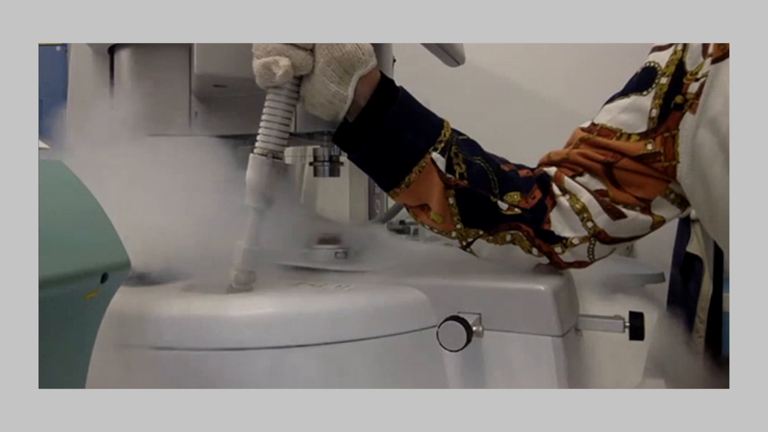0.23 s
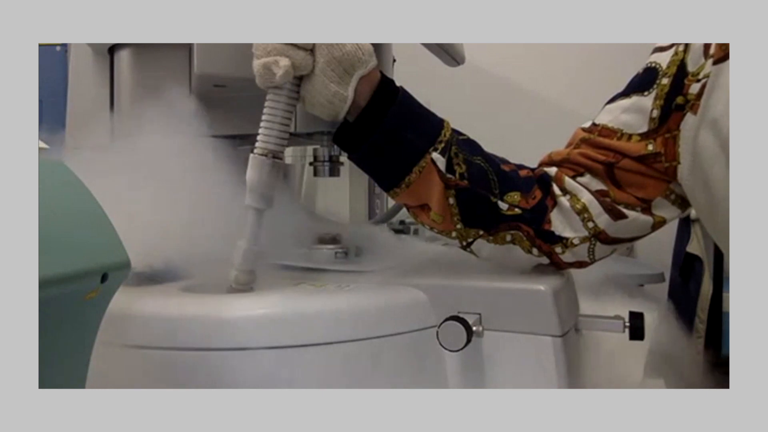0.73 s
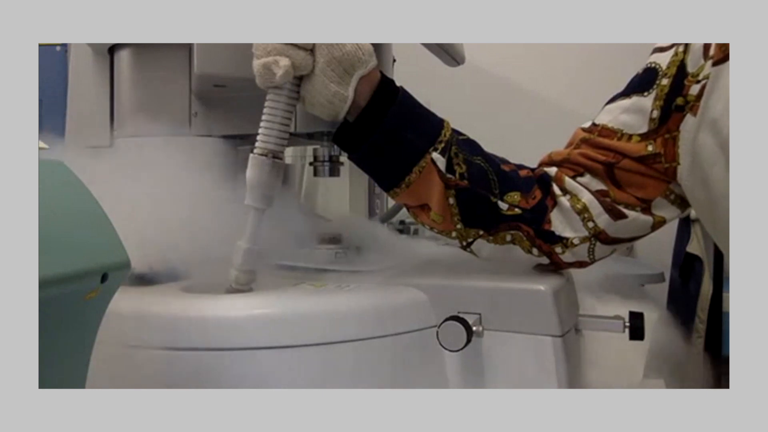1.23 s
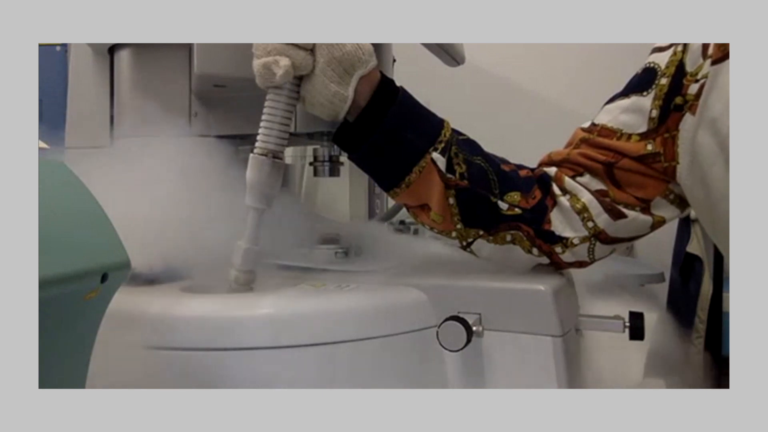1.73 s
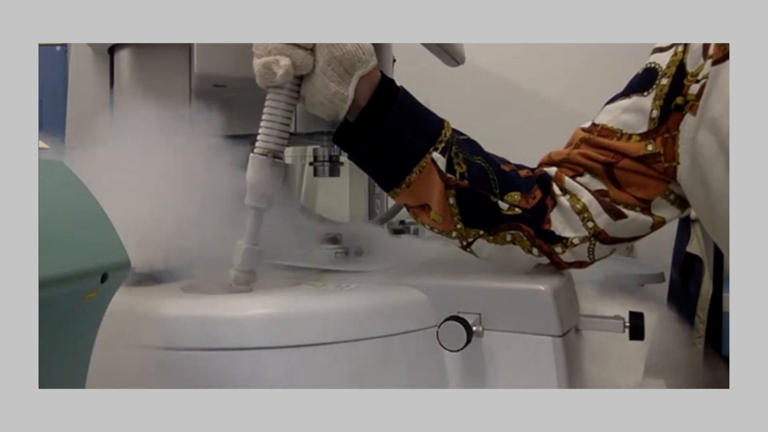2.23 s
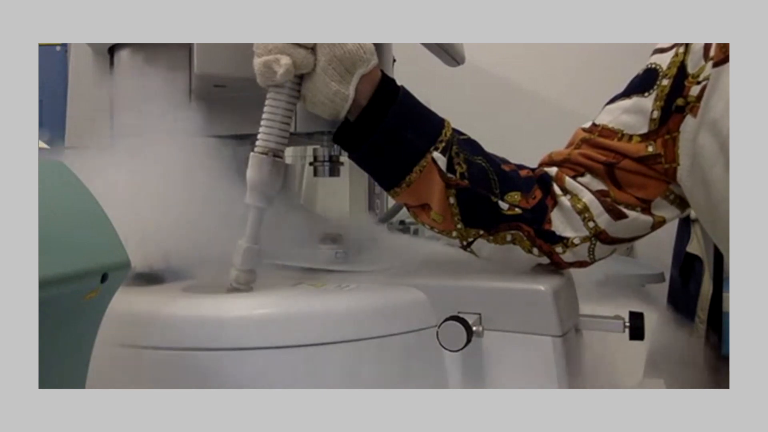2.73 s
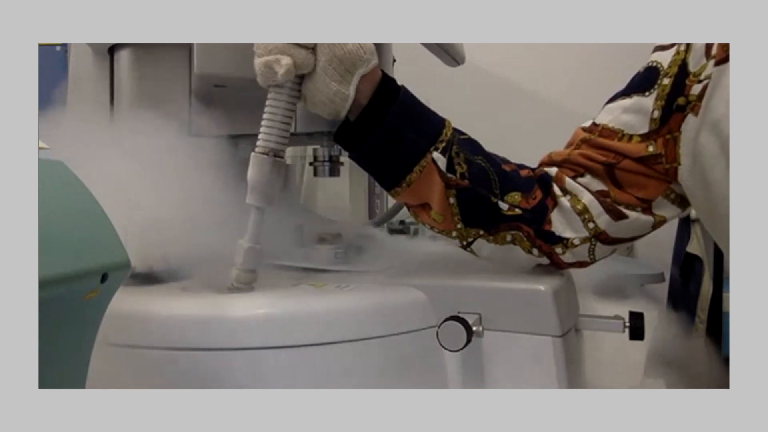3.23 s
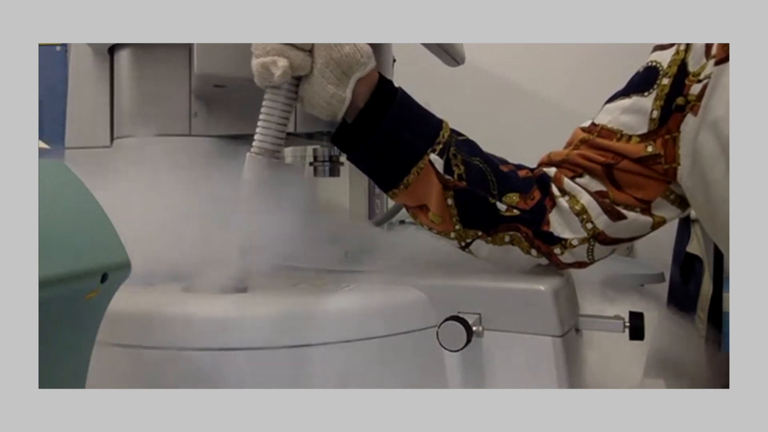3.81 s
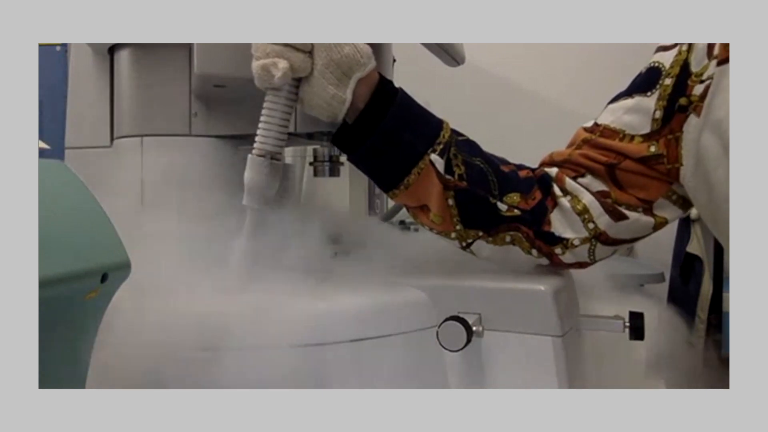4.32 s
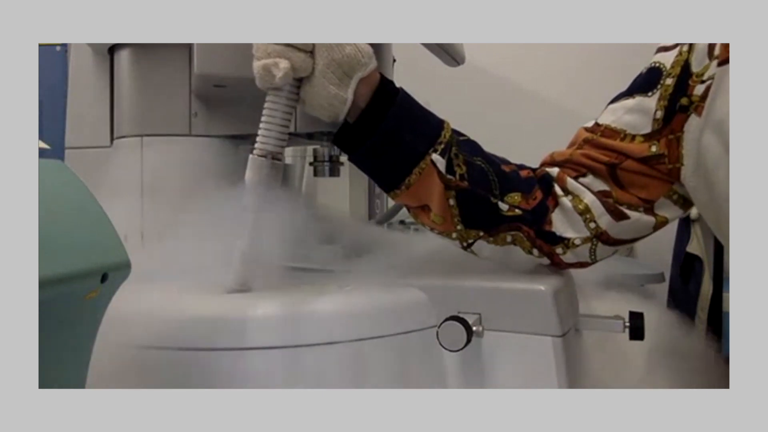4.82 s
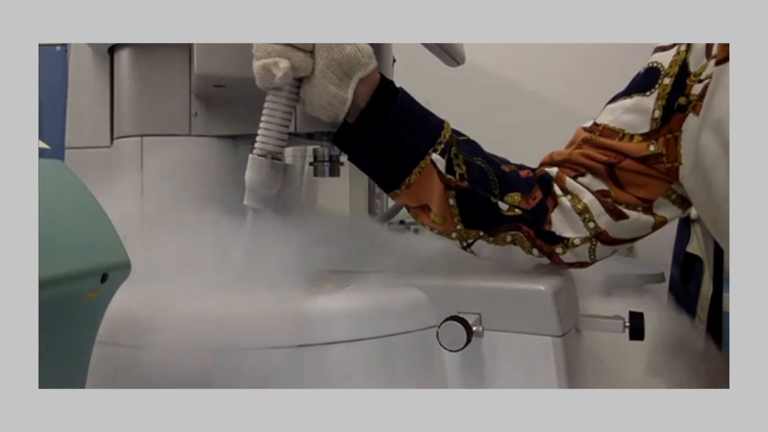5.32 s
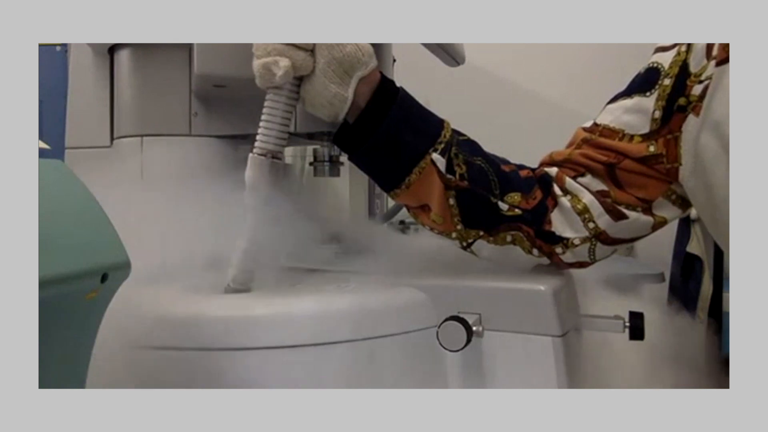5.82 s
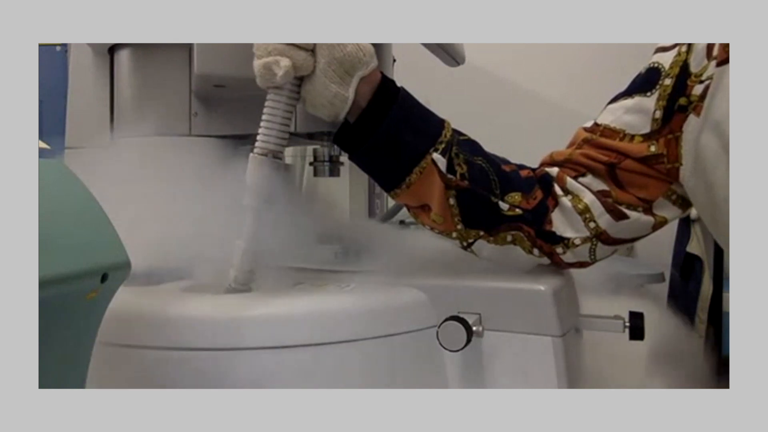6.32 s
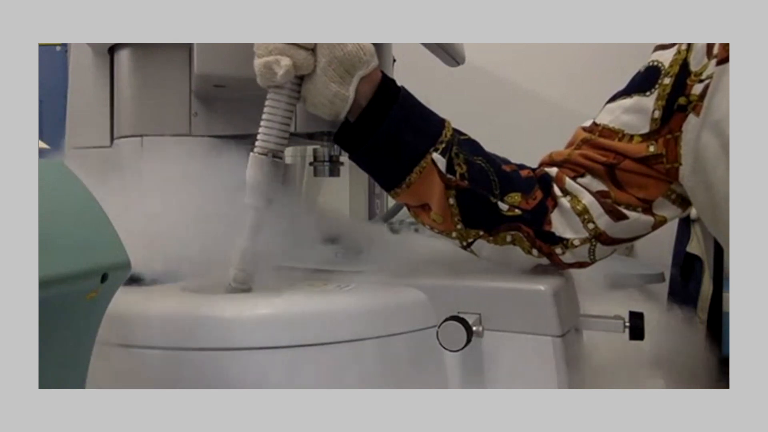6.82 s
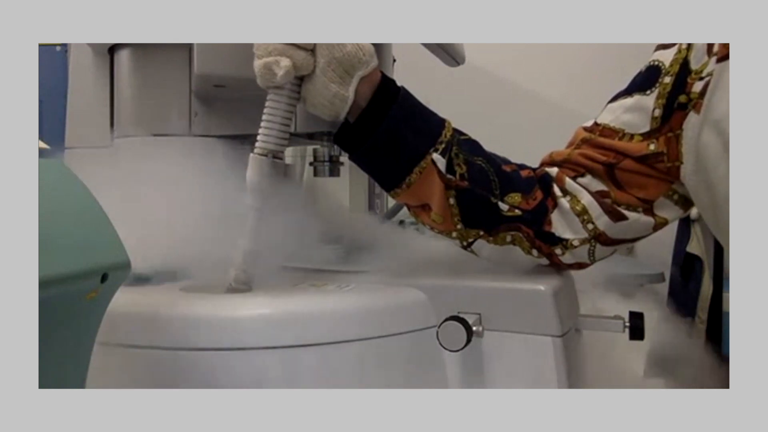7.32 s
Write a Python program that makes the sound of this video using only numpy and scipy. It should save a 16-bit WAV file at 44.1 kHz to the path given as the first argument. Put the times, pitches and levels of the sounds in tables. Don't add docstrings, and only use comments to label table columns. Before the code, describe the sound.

A bright, sputtering hiss of pressurized cold liquid spraying into a tank neck, with fluttering breathy whistles, tiny wet chirps and brief stalls.

```python
import sys
import numpy as np
from scipy import signal
from scipy.fft import rfft, irfft, next_fast_len
from scipy.io import wavfile
from scipy.ndimage import uniform_filter1d, map_coordinates

SR = 44100
rng = np.random.default_rng(int(sys.argv[2]) if len(sys.argv) > 2 else 0)


def digitize_waveform(pressure):
    field = np.atleast_2d(pressure).T
    bounded = np.clip(field, -1, 1)
    quanta = np.round(bounded * 32767).astype(np.int16)
    wavfile.write(sys.argv[1], SR, quanta)


def amplitude_ratio(level_db):
    exponent = np.asarray(level_db, float) / 20
    return 10 ** exponent


N = 332955
TIME = np.arange(N) / SR

# freq_hz, density_db (per Hz)
VENT_SPECTRUM = [(15, -65.5), (25, -40), (50, -16), (80, -9), (161, -3.5), (265, 0), (324, -5.5), (420, -6),
                 (550, -28.5), (920, -120)]
# time_s, jet_db, boiling_db
FLOW_LEVELS = [(0, -62.5, -76.5), (.25, -56.5, -71), (.55, -56, -69.5), (.8, -57, -71), (1.5, -59.5, -72),
               (2.0, -59.5, -72.5), (2.35, -57, -69.5), (3.0, -56.5, -70), (3.5, -58.5, -71.5),
               (3.92, -55.5, -69), (4.2, -59.5, -72.5), (4.55, -57.5, -68.5), (5.15, -61, -72),
               (5.45, -56, -70), (5.7, -56.5, -71), (6.2, -59.5, -73.5), (6.7, -58, -72),
               (7.55, -62.5, -75.5)]
# start_s, return_s, depth_db
GAS_POCKETS = [
    (1.275, 1.339, -10),
    (3.34, 3.379, -6.5),
    (3.835, 3.866, -4),
    (5.345, 5.4175, -12),
    (6.41, 6.441, -5),
]
# freq_hz, density_db (per Hz)
SPRAY_SPECTRUM = [(1290, -56), (2200, -26), (2700, -26), (2880, -13), (3050, -4), (3250, -1), (3600, -0.1),
                  (4170, -3), (4720, -5), (5970, -9), (6790, -9.5), (7470, -16.5), (8400, -70),
                  (10900, -120)]
# freq_hz, density_db (per Hz)
BOIL_SPECTRUM = [(210, -52), (350, -14), (661, -5), (865, -11.5), (986, -9.5), (1770, -12.5), (2520, -9),
                 (2800, -2.5), (3640, -30.5), (6160, -120)]
# pitch_hz, width_hz, boost_db
HOSE_MODES = [(670, 61, 1.5), (984, 38, 7.5), (1067, 26, 5.5), (1307, 62, 5), (1560, 210, 2.5)]
# time_s, pitch_hz, level_db
LOW_WHISTLE = [(0, 3750, -47.5), (.2, 3680, -45), (.36, 3800, -52), (.55, 3930, -48.5), (.72, 3740, -44.5),
               (1.0, 3680, -44), (1.25, 3820, -47), (1.65, 3670, -43), (2.05, 3690, -47.5),
               (2.7, 3625, -42.5), (3.55, 3650, -43.5), (4.05, 3500, -57.5), (4.33, 3560, -48.5),
               (4.5, 3680, -37.5), (4.75, 3540, -45.5), (5.5, 3590, -43.5), (6.2, 3530, -50),
               (7.55, 3650, -50)]
# time_s, length_s, level_db, pitch_hz
LOW_WHISTLE_SWELLS = [(3.319, .1, -44, 3650), (5.129, .08, -46.5, 3675), (.78, 0.099, -46, 3718),
                      (1.0, .1, -46, 3670), (4.57, .07, -43, 3651), (6.66, .2, -46, 3750),
                      (6.949, .15, -48, 3620)]
# time_s, length_s, level_db, pitch_hz
MID_WHISTLE_SWELLS = [(.25, .15, -46, 4640), (.47, .12, -47, 4200), (.86, .2, -47, 4710),
                      (1.15, .2, -51, 4673), (2.14, .12, -47, 4456), (2.39, .12, -44, 4516),
                      (2.64, .12, -45, 4610), (2.9, .4, -46.5, 4800), (3.7, .3, -52, 4870),
                      (4.0, .18, -45, 4994), (4.4, .14, -43, 4980), (4.6, .2, -44, 4640),
                      (5.32, .08, -48, 4630), (5.47, .1, -47, 4600), (5.91, .14, -49, 4445),
                      (6.29, .12, -51.5, 4510), (6.82, .18, -47.5, 4595)]
# time_s, length_s, level_db, pitch_hz
TOP_WHISTLE_SWELLS = [(.5, .1, -47.5, 7210), (.88, .15, -51, 7007), (1.1, 0.1498, -53, 6830),
                      (1.72, .2, -53, 6930), (2.139, .12, -54, 6800), (2.391, .1, -52, 6704),
                      (3.201, .3, -53.5, 6890), (3.62, .15, -48.5, 6910), (3.9, .13, -42, 6993),
                      (4.499, .4, -57.5, 6790), (5.28, .14, -55, 7200), (5.55, .35, -50.5, 6854),
                      (5.92, .2, -56, 6760), (6.29, .1, -57, 6610), (7.0, .2, -57.5, 6960)]
# start_s, peak_db, pitch_hz
SLUG_CHIRPS = [(.0942, -34, 3710), (.4214, -34, 4120), (.6429, -32, 4060), (.9308, -36, 3620),
               (2.1141, -34, 3650), (2.4798, -33, 3700), (2.5815, -33, 3630), (2.6803, -32, 3460),
               (2.7362, -31, 3780), (2.8739, -32, 3490), (3.0515, -33, 3700), (3.3144, -31, 3660),
               (3.3987, -33, 3320), (3.461, -34, 3640), (3.6331, -32, 3720), (4.3909, -29, 3600),
               (4.4792, -30, 3780), (4.557, -30, 3670), (4.579, -28, 3590), (4.8494, -29, 3550),
               (5.0, -33, 3580), (5.0649, -32, 3840), (5.2679, -33, 3810), (5.306, -23, 3600),
               (5.3428, -29, 3600), (5.349, -28, 3620), (5.4221, -36, 3540), (5.5069, -32, 3450),
               (5.5373, -32, 3580), (7.0833, -34, 3490)]
# start_s, peak_db, pitch_hz, length_s
SLUG_SQUEAKS = [(0.517, -36, 7210, 0.0074), (0.75, -35.5, 4510, 0.008), (2.1116, -37, 4430, 0.0097),
                (2.238, -35.5, 4470, 0.0066), (2.616, -38.5, 4320, 0.0059), (2.802, -34, 4970, 0.0071),
                (3.887, -32, 7000, 0.0073), (3.91, -30.5, 7010, 0.0069), (4.414, -32, 5180, 0.0067),
                (4.4872, -32.5, 4430, 0.0097), (4.532, -30, 4960, 0.008), (5.415, -44, 4550, 0.0073),
                (5.959, -36.5, 4420, 0.0074), (6.444, -38.5, 5540, 0.0067)]
# start_s, peak_db, pitch_hz, length_s
NECK_BUBBLES = [
    (1.031, -62, 1520, 0.025),
    (2.366, -59, 976, 0.024),
    (2.507, -61, 1350, 0.02),
    (2.624, -55.5, 1025, 0.02),
    (3.21, -60, 1335, 0.02),
    (4.9, -57.5, 1330, 0.017),
    (7.007, -62, 1495, 0.022),
]
# freq_hz, gain_db
MIC_RESPONSE = [(7200, -1), (7600, -7), (7850, -10), (8050, -16), (8150, -50), (8300, -93.5)]
# time_s, low_hz, high_hz, level_db
CHANNEL_SPLITS = [(1.253, 6280, 7500, -64), (1.462, 4200, 6240, -54), (2.79, 4580, 6220, -53),
                  (3.947, 4230, 5650, -51), (4.97, 6400, 7500, -65.5), (6.338, 5170, 6900, -62)]


def unit(x):
    return x / np.sqrt(np.mean(np.abs(x) ** 2) + 1e-20)


def along(points, hz):
    f, v = np.transpose(points)
    return np.interp(np.log(hz + 1), np.log(f + 1), v)


def curves(rows):
    s, *columns = np.transpose(rows)
    return [np.interp(TIME, s, column) for column in columns]


def wobble(rate):
    knots = rng.standard_normal(4000)
    return map_coordinates(knots, [TIME * rate])


def filtered(x, response):
    size = next_fast_len(N + 8192)
    spectrum = rfft(x, size) * response(np.fft.rfftfreq(size, 1 / SR))
    return unit(irfft(spectrum, size)[..., :N])


def patchy(patchy_db, spray, size):
    z = signal.stft(rng.standard_normal(N), nperseg=size)[2]
    field = uniform_filter1d(rng.standard_normal(z.shape), size=5, axis=0)
    field = uniform_filter1d(field, size=8, axis=1)
    hiss = signal.istft(z * amplitude_ratio(patchy_db * unit(field)), nperseg=size)[1][:N]
    drops = rng.standard_normal(N) * (rng.random(N) < .03)
    spray = np.clip(spray, 0, 1)
    return np.sqrt(1 - spray) * unit(hiss) + np.sqrt(spray) * unit(drops)


def vents():
    return amplitude_ratio(-82.5) * filtered(rng.standard_normal(N), lambda f: amplitude_ratio(along(VENT_SPECTRUM, f)))


def chirps():
    out = np.zeros(N + SR)
    t = np.arange(SR // 10) / SR
    slug_s = .012
    slugs = [(*row, slug_s) for row in SLUG_CHIRPS]
    for start_s, peak_db, pitch_hz, length_s in slugs + SLUG_SQUEAKS + NECK_BUBBLES:
        u = t / (.16 * length_s)
        swell = (u / 2) ** 2 * np.exp(2 - u)
        first = max(round((start_s - .002) * SR), 0)
        out[first:][:len(t)] += amplitude_ratio(peak_db - 3.0) * swell * np.sin(2 * np.pi * pitch_hz * t)
    return out[:N]


def swelling(rest_hz, rest_db, swells):
    power = amplitude_ratio(2 * rest_db) * np.ones(N)
    pull = power * rest_hz
    for time_s, length_s, level_db, pitch_hz in swells:
        bump = amplitude_ratio(2 * level_db) * np.exp(-(2 * (TIME - time_s) / length_s) ** 2)
        power = power + bump
        pull = pull + bump * pitch_hz
    return pull / power, 10 * np.log10(power)


def breathy(track, width_hz, flutter_db, under_db):
    hz, db = track
    noise = rng.standard_normal((2, N))
    a, b = filtered(noise, lambda f: 1 / (1 + (2 * f / width_hz) ** 2) ** 1.146)
    phase = 2 * np.pi * np.cumsum(hz * (1 + .009 * wobble(35))) / SR
    gusts = amplitude_ratio(flutter_db * (wobble(60) + 0.44 * wobble(25)))
    return amplitude_ratio(db - under_db) * unit(gusts * (a * np.cos(phase) + b * np.sin(phase)))


def whistles(sputter):
    low_track = swelling(*curves(LOW_WHISTLE), LOW_WHISTLE_SWELLS)
    mid_track = swelling(4570, -55, MID_WHISTLE_SWELLS)
    top_track = swelling(6750, -65, TOP_WHISTLE_SWELLS)
    low = breathy(low_track, width_hz=400, flutter_db=2.4, under_db=3.5)
    mid = breathy(mid_track, width_hz=700, flutter_db=2.4, under_db=4.5)
    top = breathy(top_track, width_hz=520, flutter_db=2.5, under_db=4)
    return amplitude_ratio(0.14 * sputter) * (low + mid + top)


def stalls():
    db = np.zeros(N)
    for start_s, return_s, depth_db in GAS_POCKETS:
        times = [start_s, (start_s + return_s) / 2, return_s - .003, return_s]
        db += np.interp(TIME, times, [0, .75 * depth_db, depth_db, 0])
    return amplitude_ratio(db)


def boiling(boil_db):
    mean_db, handover_hz = -72, 1200
    hose_db = mean_db + .9 * (boil_db - mean_db)
    neck_db = mean_db + 1.3 * (boil_db - mean_db)

    def ringing(f):
        modes_db = sum(db / (1 + (2 * (f - hz) / width) ** 2) for hz, width, db in HOSE_MODES)
        return amplitude_ratio(along(BOIL_SPECTRUM, f) + modes_db)

    def hose_share(f):
        return 1 / (1 + (f / handover_hz) ** 20)

    boil = patchy(patchy_db=1.9, spray=.16, size=512)
    hose = filtered(boil, lambda f: ringing(f) * hose_share(f))
    neck = filtered(boil, lambda f: ringing(f) * (1 - hose_share(f)))
    return amplitude_ratio(hose_db - 0.8) * hose + amplitude_ratio(neck_db + 3.0) * neck


def jet(sputter):
    jet_db, boil_db = curves(FLOW_LEVELS)
    noise = patchy(patchy_db=3.0, spray=.35, size=256)
    spray = filtered(noise, lambda f: amplitude_ratio(along(SPRAY_SPECTRUM, f)))
    return amplitude_ratio(jet_db + 10.5 + .9 * sputter) * spray + amplitude_ratio(0.58 * sputter) * boiling(boil_db)


def scene():
    sputter = .6 * wobble(14) + wobble(30)
    starved = stalls()
    mono = vents() + chirps()
    mono += starved ** .75 * whistles(sputter)
    mono += starved * jet(sputter)
    return np.array([mono, mono])


def splits():
    side = np.zeros(N)
    for time_s, low_hz, high_hz, level_db in CHANNEL_SPLITS:
        band = filtered(rng.standard_normal(N), lambda f: (f > low_hz) & (f < high_hz))
        side += amplitude_ratio(level_db) * band / (1 + ((TIME - time_s) / 0.013) ** 8)
    return np.array([side, -side])


def band_limit(x):
    return signal.sosfilt(signal.butter(12, 8610, fs=SR, output="sos"), x)


def record(dry):
    level = np.sqrt(np.mean(dry ** 2))
    heard = level * filtered(dry, lambda f: amplitude_ratio(along(MIC_RESPONSE, f)))
    return band_limit(heard + splits())


dry = scene()
out = record(dry)
digitize_waveform(out)
```